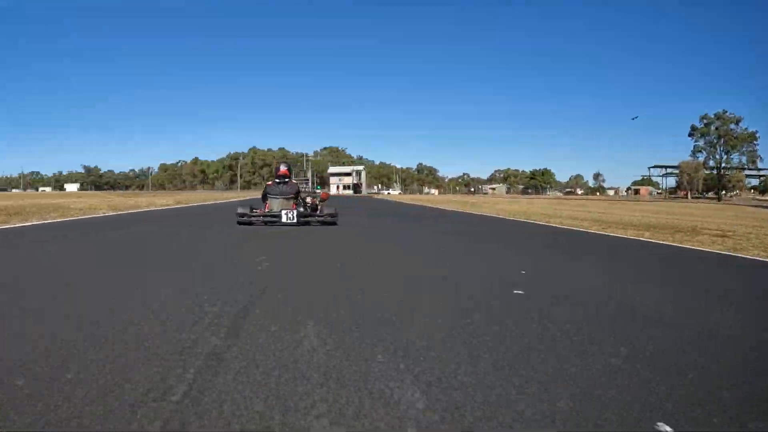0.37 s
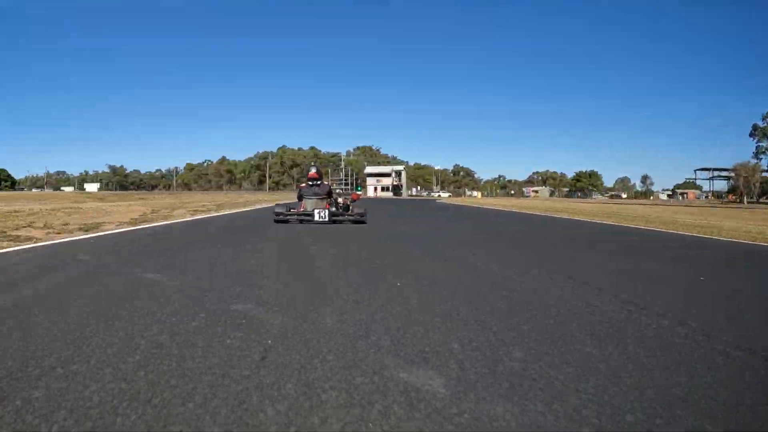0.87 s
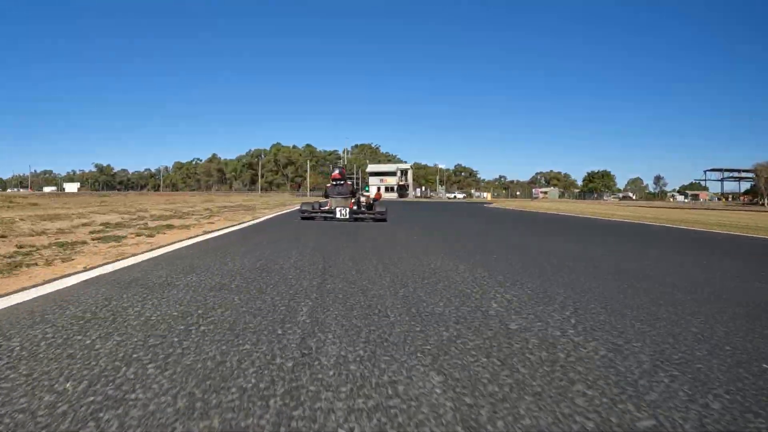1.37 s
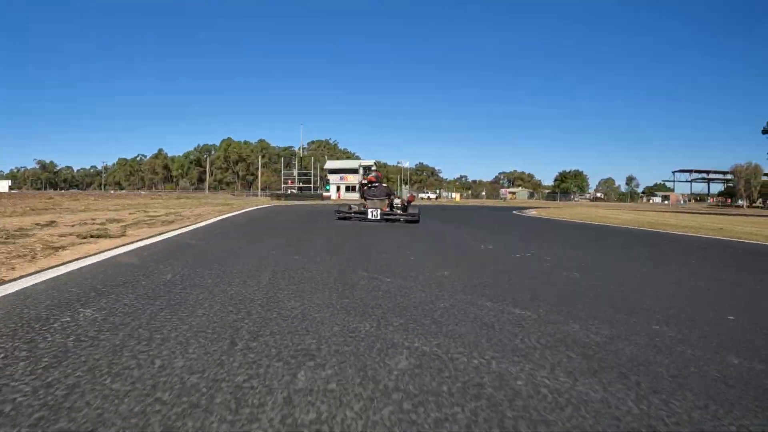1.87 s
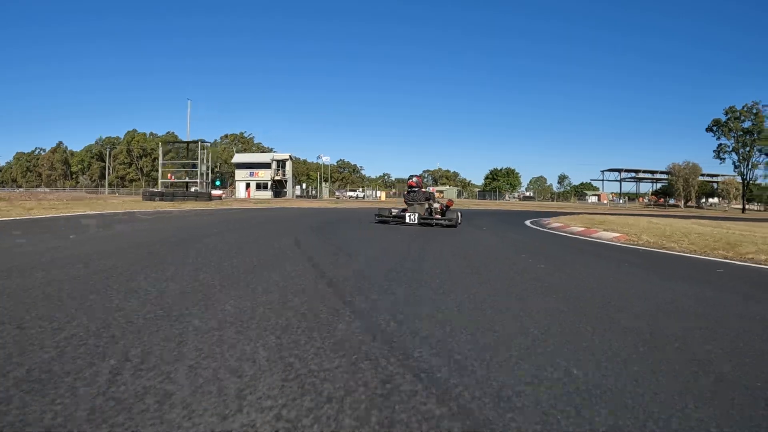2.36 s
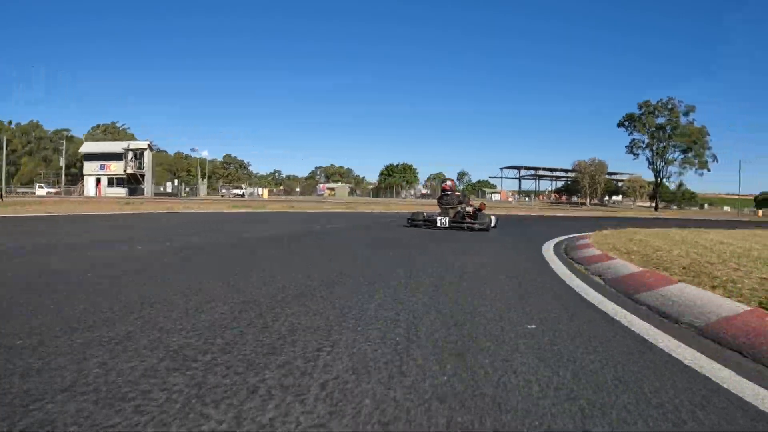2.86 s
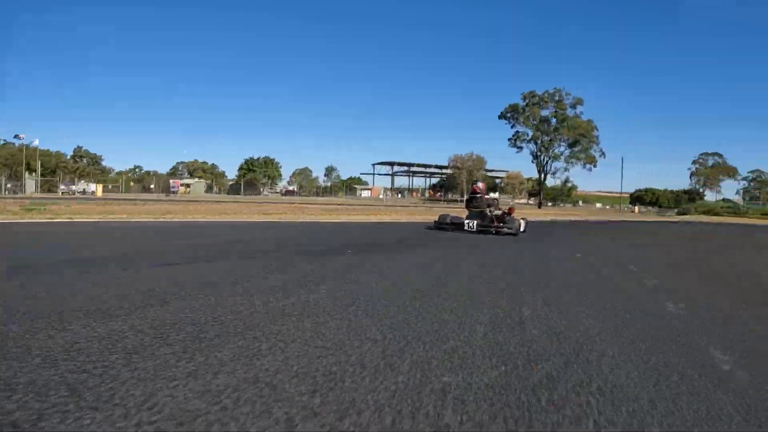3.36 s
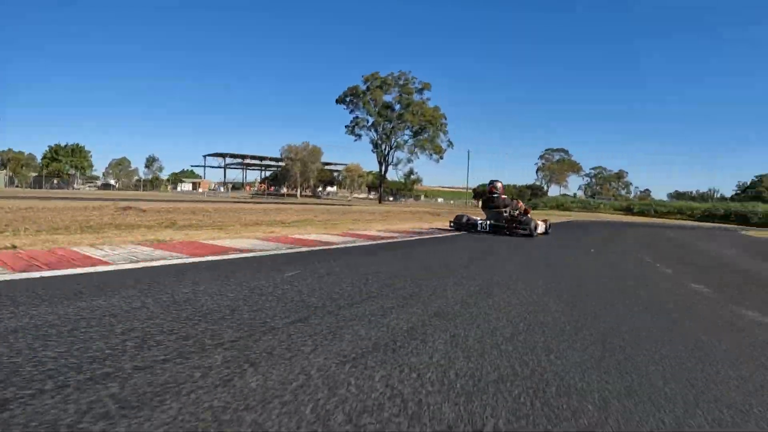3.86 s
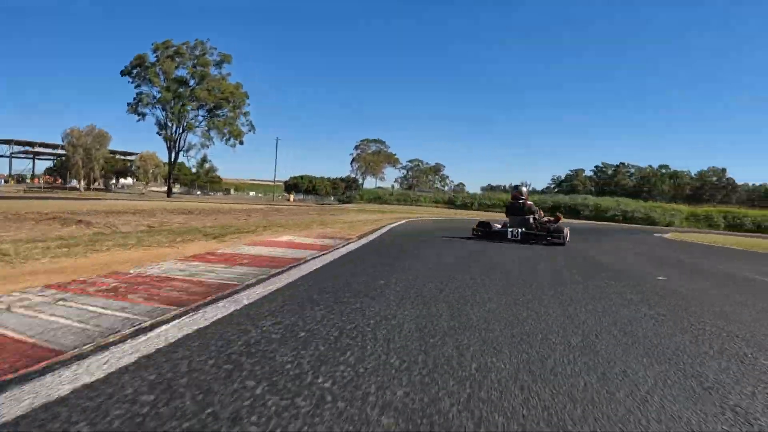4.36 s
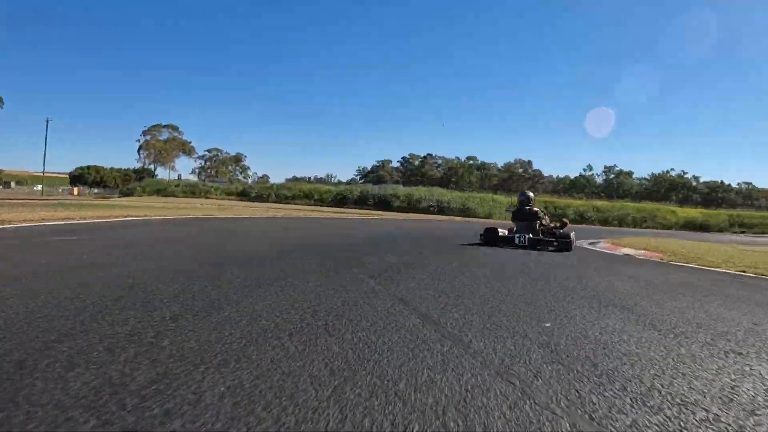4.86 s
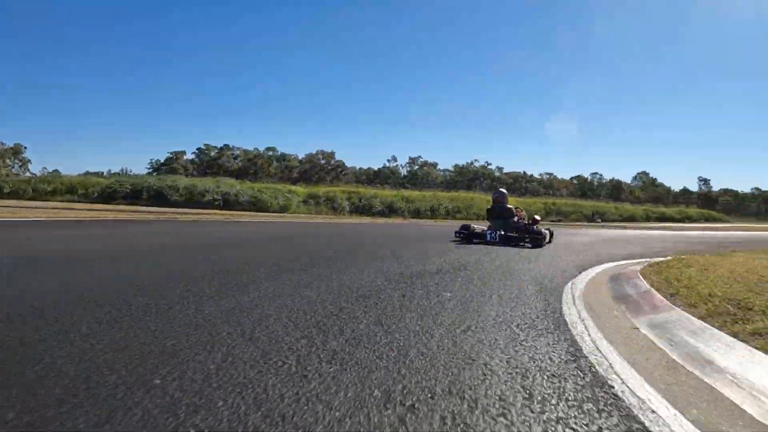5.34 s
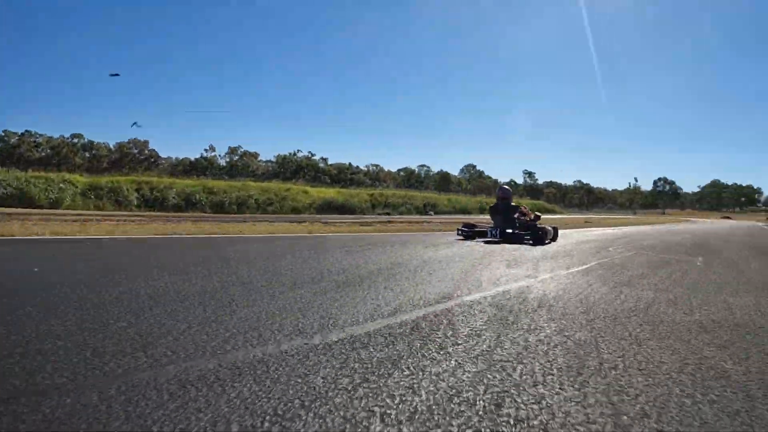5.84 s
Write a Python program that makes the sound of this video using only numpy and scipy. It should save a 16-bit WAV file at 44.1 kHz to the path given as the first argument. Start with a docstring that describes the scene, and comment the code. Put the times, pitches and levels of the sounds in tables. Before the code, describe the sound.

A racing kart engine drones and roars low and muffled, then its exhaust breaks into thickening sharp pops over rumble, wind and treble rattle.

```python
"""An engine drone in low crank orders over frame rumble, a low half-order throb, a beating roar, a whine and a
treble rattle: on board a racing kart on an open circuit, another kart just ahead. Grit ticks on the dull
housing. From the end of the straight the exhaust pops, each pop a crack, a pipe ring and a late thump, with a
swelling treble hiss. Orders are sines, beds are shaped noise, pops are decaying modes."""
import sys
import numpy as np
from scipy import signal
from scipy.fft import rfft, irfft
from scipy.io import wavfile
from scipy.ndimage import uniform_filter1d

SR = 44100
rng = np.random.default_rng(int(sys.argv[2]) if len(sys.argv) > 2 else 0)


def master_out(mix):
    """Clip the mix to full scale and print it as 16-bit PCM to the path in sys.argv[1]."""
    frames = np.transpose(np.atleast_2d(mix))
    ceiling = np.clip(frames, -1, 1)
    pcm = np.round(ceiling * 32767).astype(np.int16)
    wavfile.write(sys.argv[1], SR, pcm)


def volts_from_db(level):
    """Convert decibel levels to linear amplitude ratios."""
    exponent = np.asarray(level, float) / 20
    return 10 ** exponent


N = 263277


def rms_one(x):
    """Scale to unit rms."""
    return x / np.sqrt(np.mean(x ** 2) + 1e-20)


def in_time(rows):
    """Columns of a curve table, interpolated at every sample."""
    s, *columns = np.transpose(rows)
    return [np.interp(np.arange(N) / SR, s, column) for column in columns]


def at_hz(points, hz):
    """Read a spectrum on a log-frequency axis."""
    point_hz, point_db = np.transpose(points)
    return np.interp(np.log(hz), np.log(point_hz), point_db)


def drift(rate_hz):
    """Slow random curve of rms 1: noise through two equal poles at rate_hz."""
    step, settle = 40, 2000   # samples per point, points discarded
    r = np.exp(-2 * np.pi * rate_hz * step / SR)
    noise = rng.standard_normal(N // step + settle + 2)
    slow = signal.lfilter([1], [1, -2 * r, r * r], noise)[settle:]
    return np.interp(np.arange(N) / step, np.arange(len(slow)), rms_one(slow))


def coloured(spectrum):
    """Noise with the given spectrum, rms 1."""
    hz = np.maximum(np.fft.rfftfreq(N, 1 / SR), 1)
    white = rfft(rng.standard_normal(N))
    return rms_one(irfft(white * volts_from_db(at_hz(spectrum, hz)), N))


def ring(drive, hz, t60_s):
    """Two-pole resonator: a unit click sets a decaying sine of height 1 ringing."""
    r, w = volts_from_db(-60 / (t60_s * SR)), 2 * np.pi * hz / SR
    return signal.lfilter([0, np.sin(w)], [1, -2 * r * np.cos(w), r * r], drive + 1e-18)


def resonance(drive, hz, width_hz):
    """Resonator set by its bandwidth, from which its decay follows."""
    return ring(drive, hz, t60_s=np.log(1000) / np.pi / width_hz)


def soften(x, cut_hz):
    """Steep low-pass."""
    return signal.sosfilt(signal.butter(4, min(cut_hz, .45 * SR), fs=SR, output="sos"), x)


def dying(clicks, t60_s):
    """Each click becomes an exponential decay."""
    return signal.lfilter([1], [1, -volts_from_db(-60 / (t60_s * SR))], clicks + 1e-18)


# engine speed: start_s, speed_turns_per_s (crank)
ENGINE_SPEED = [(0, 35.4), (.38, 35.6), (.7, 35.7), (1.39, 38.2), (1.77, 39.4), (2.3, 40.2), (3, 41.4),
                (3.74, 42.4), (4.4, 43.1), (4.7, 42.7), (5.3, 41.5), (5.97, 41.5)]
# firing evenness as level of the upper orders, and roar: start_s, upper_db, roar_db
ENGINE_LEVELS = [(0, -27.5, -19.5), (.35, -28.5, -19.5), (.7, -22, -20), (1, -22.5, -19), (1.3, -23, -21.5),
                 (1.6, -23, -19.5), (1.85, -24, -21.5), (2.15, -27.5, -20), (3, -26.5, -24.5),
                 (3.55, -34.5, -20), (4.2, -33.5, -24), (4.6, -27.5, -22.5), (5, -26, -19),
                 (5.5, -38, -20.5), (5.97, -25, -24)]
# frame's uneven passing of the three lowest orders: pitch_hz, level_db
FRAME_RESPONSE = [(35, -18), (39, -16), (41.5, -18), (43.5, -11), (70, -19), (74, -23), (79, -17.5),
                  (83, -19), (87, -21.5), (106, -21.5), (110, -18), (118, -28.5), (124, -23.5), (129, -18)]
# pipe resonances that swell the upper orders: pitch_hz, level_db
PIPE_RESPONSE = [(130, -15), (146, -3.5), (157, 2), (185, -3.5), (213, 1.5), (238, -16), (260, -12.5),
                 (282, -7.5), (296, -6.5), (308, -1), (318, -3.5), (340, -20.5), (450, -8.5), (520, -28),
                 (600, -21.5), (700, -18), (900, -30)]
LOW_ORDER_WANDER_RAD = .6


def drone(turns, speed, upper_db, waver_db, wander_rad, shake_db):
    """Crank orders as sines; the low three shake with the frame, the rest wander more with their order."""
    out = np.zeros(N)
    sag_db = misfiring()
    for order in range(1, 23):
        hz = order * speed
        if order <= 3:
            level_db = at_hz(FRAME_RESPONSE, hz) + sag_db + shake_db * drift(4.4)
            phase_spread_rad = LOW_ORDER_WANDER_RAD
        else:
            level_db = upper_db + at_hz(PIPE_RESPONSE, hz)
            phase_spread_rad = wander_rad * order
        phase = 2 * np.pi * (order * turns + rng.random()) + phase_spread_rad * drift(2.73)
        level_db = level_db + waver_db * np.log(order) * drift(4.0)
        out += np.sqrt(2) * volts_from_db(level_db) * np.sin(phase)   # level is rms
    return out


# engine half-order throb peaking near 23 Hz: pitch_hz, level_db_per_hz
HALF_ORDER_SPECTRUM = [(8, -14), (17, 20), (23, 15.5), (29, 8), (40, -41.5), (200, -140)]
HALF_ORDER_DB, HALF_ORDER_SWELL_DB = -34, 4


def half_order():
    """Low noise band at the engine's half order, swelling and fading at random."""
    return volts_from_db(HALF_ORDER_DB + HALF_ORDER_SWELL_DB * drift(7.0)) * coloured(HALF_ORDER_SPECTRUM)


# frame rumble: pitch_hz, level_db_per_hz
RUMBLE_SPECTRUM = [(25, -50), (38, -21.5), (46, 25.5), (54, 26.5), (63, 17.5), (75, -17.5), (110, -31.5),
                   (300, -140)]
# bumps in the track: centre_s, level_db, length_s
TRACK_BUMPS = [(0.961, -30.5, 0.44), (1.814, -21, 0.13), (2.46, -31, 0.082), (3.323, -41, 0.091),
               (3.705, -13.5, 0.04), (4.152, -17, 0.16), (5.32, -17, 0.081), (4.542, -26, 0.1),
               (4.856, -16, 0.093), (5.86, -19.5, 0.061)]
RUMBLE_DB = -19.5


def rumble():
    """Low frame noise, swelling and fading over each bump."""
    t = np.arange(N) / SR
    swell = volts_from_db(RUMBLE_DB)
    for centre_s, level_db, length_s in TRACK_BUMPS:
        swell = swell + volts_from_db(level_db) * np.exp(-(2 * (t - centre_s) / length_s) ** 2)
    return swell * coloured(RUMBLE_SPECTRUM)


def beat(turns, depth):
    """A puff once per crank turn, each of its own size; rms 1."""
    sizes = volts_from_db(2.9 * rng.standard_normal(int(turns[-1]) + 1))[turns.astype(int)]
    return rms_one(1 - depth + depth * sizes * np.sin(np.pi * turns) ** 2)


# roar of both karts through the housing: pitch_hz, level_db_per_hz
ROAR_SPECTRUM = [(45, -27), (72, -6), (95, -9.5), (130, -4), (205, 0), (290, -3), (360, -6.5), (450, -7),
                 (670, -14.5), (990, -24.5), (1260, -23), (1750, -31.5), (2500, -46.5), (3400, -76),
                 (6000, -115)]
ROAR_SWAY_DB, ROAR_FLUTTER_DB = 1.66, .8
# even firing moves the low roar into the orders: loss per dB of evenness above the rough level
CLEARING_DB_PER_DB, CLEAR_BELOW_HZ, ROUGH_AT_DB = 0.18, 490, -27.5


def roar(turns, roar_db, upper_db):
    """Beating engine noise whose low part thins while the firing is even."""
    level_db = roar_db + ROAR_SWAY_DB * drift(1.6) + ROAR_FLUTTER_DB * drift(17.0)
    noise = volts_from_db(level_db) * coloured(ROAR_SPECTRUM) * beat(turns, depth=0.33)
    low = signal.sosfiltfilt(signal.butter(2, CLEAR_BELOW_HZ, fs=SR, output="sos"), noise)
    loss_db = CLEARING_DB_PER_DB * np.maximum(upper_db - ROUGH_AT_DB, 0)
    return noise - low * (1 - volts_from_db(-loss_db))


# narrow cavity resonances: pitch_hz, width_hz, level_db
CAVITIES = [(1668, 290, -46), (3030, 170, -67.5), (3936, 90, -70), (4340, 330, -64.5)]


def hollows():
    """Noise ringing in narrow cavities, swelling and fading."""
    out = np.zeros(N)
    for hz, width_hz, level_db in CAVITIES:
        tone = resonance(rng.standard_normal(N), hz, width_hz)
        out += volts_from_db(level_db + 2.0 * drift(3.0)) * rms_one(soften(tone, 1.15 * hz))
    return out


# whine that comes and goes: start_s, level_db
WHINE_LEVEL = [(0, -44), (.35, -38.5), (.85, -38.5), (1.25, -34), (1.45, -41.5), (1.9, -41), (2.3, -38),
               (3.1, -43.5), (3.28, -36.5), (3.5, -33), (3.88, -43), (4.08, -38), (4.46, -41), (5.3, -45),
               (5.95, -52.5)]
WHINE_HZ, WHINE_WIDTH_HZ, WHINE_STROKE_DB = 1358, 45, 1


def whine():
    """Noise in one narrow resonance, its drive swelling in short strokes."""
    level_db, = in_time(WHINE_LEVEL)
    drive = volts_from_db(WHINE_STROKE_DB * drift(6.1)) * rng.standard_normal(N)
    tone = resonance(drive, WHINE_HZ, WHINE_WIDTH_HZ)
    return volts_from_db(level_db) * rms_one(soften(tone, cut_hz=2000))


# chain and bodywork rattle: pitch_hz, level_db_per_hz
RATTLE_SPECTRUM = [(1500, -49), (2400, -18.5), (2900, 4), (3400, -3), (4050, -1.5), (5000, -4.5),
                   (5850, -6.5), (6200, -11), (6900, -8), (8500, -16), (10000, -28), (12500, -34),
                   (15000, -43), (16500, -76.5)]
# level at the reference speed, growth per turn/s, reference speed
RATTLE_DB, RATTLE_DB_PER_TURN_PER_S, RATTLE_AT_TURNS_PER_S = -52.5, 0.6, 40.44


def rattle(speed, grains_per_s, grain_db):
    """A treble hiss growing with engine speed, roughened by dense uneven grains."""
    struck = rng.random(N) < grains_per_s / SR
    grains = struck * volts_from_db(grain_db * np.minimum(rng.exponential(1, N), 4))
    lumps = uniform_filter1d(grains, size=90)
    roughness = rms_one(5.8 + lumps / lumps.mean())
    flutter = volts_from_db(1.7 * drift(20.0))
    level_db = RATTLE_DB + RATTLE_DB_PER_TURN_PER_S * (speed - RATTLE_AT_TURNS_PER_S)
    return volts_from_db(level_db) * coloured(RATTLE_SPECTRUM) * roughness * flutter


# grit hitting the housing: start_s, peak_db, top_octave_db (against the peak)
GRIT_TICKS = [(0.6405, -45, -13), (1.6214, -48, -9.5), (1.801, -45, -21.5), (1.8252, -48.5, -25),
              (2.182, -34.5, -11), (2.6538, -48, -13.5), (2.741, -40, -24), (2.774, -57, -17.5),
              (2.8121, -44, -25), (2.8252, -41, -11), (2.989, -53, -24), (3.0905, -49, -13),
              (3.184, -47, -21), (3.2674, -53, -16), (3.501, -45.5, -12.5), (3.74, -40, -14),
              (3.8677, -62, -26), (4.0159, -42.5, -20), (4.3102, -41.5, -21), (5.3535, -42.5, -19.5),
              (2.899, -52.5, -10), (3.029, -33.5, -21.5), (3.2046, -41, -15), (3.2136, -38.5, -31.5),
              (3.2475, -46.5, -11.5), (3.2907, -48, -12.5), (3.308, -39, -17.5), (3.3345, -41, -19),
              (3.381, -41, -19), (3.389, -45, -28), (3.5164, -38, -29), (3.5832, -47, -26),
              (3.618, -38.5, -27.5), (3.723, -43, -19), (3.7684, -36.5, -36.5), (3.8211, -35.5, -24.5),
              (3.928, -39, -37), (4.034, -31, -25.5), (4.1454, -42, -14), (4.4935, -54, -21),
              (4.517, -50, -30), (4.541, -48, -27), (4.566, -56, -30), (4.637, -50, -25),
              (4.729, -42.5, -27.5), (4.7994, -56.5, -22), (4.8239, -52, -16), (5.327, -33.5, -19),
              (5.346, -40.5, -21.5)]
# faint ticks between the loud ones, once the kart turns in
GRIT_PER_S, GRIT_DB, GRIT_SPREAD_DB, GRIT_FROM_S = 19, -64, 6.5, 1.7


def ticks(length_s):
    """Very short bright noise bursts; some reach far higher than others."""
    s, peak_db, top_db = np.transpose(GRIT_TICKS)
    struck = (rng.random(N) < GRIT_PER_S / SR) * (np.arange(N) > GRIT_FROM_S * SR)
    faint = struck * volts_from_db(GRIT_DB + GRIT_SPREAD_DB * rng.standard_normal(N))
    body = [(2500, -10.5), (3800, 6.5), (4500, -2), (7000, -1.5), (9000, -13.0), (10500, -45.0)]
    top = [(6000, -39.5), (9500, 1), (15000, 0.0), (17000, -40.0)]
    out = np.zeros(N)
    for level_db, faint_db, spectrum in ((peak_db, 0.1, body), (peak_db + top_db, -18, top)):
        clicks = faint * volts_from_db(faint_db)
        clicks[(s * SR).astype(int)] = volts_from_db(level_db)
        out += coloured(spectrum) * uniform_filter1d(dying(clicks, length_s), size=30)
    return out


# exhaust pops: start_s, crack_db, thump_db, sizzle_db (last two against the crack)
EXHAUST_POPS = [(1.6806, -19.5, 5.0, -2.0), (1.7134, -25.5, 8.0, 0.5), (1.7561, -18.0, 3.5, 0.0),
                (1.8599, -18.5, 4.0, -1.5), (1.8906, -23.0, 5.5, 0.0), (1.936, -18.5, 5.5, 1.5),
                (2.1132, -25.0, 5.0, 1.5), (2.3622, -20.5, 2.5, 0.5), (2.4061, -16.0, 3.0, 0.0),
                (2.5337, -18.0, 3.5, 1.0), (2.5819, -21.5, 1.0, 1.0), (2.6563, -20.0, 4.5, 1.0),
                (2.6985, -15.5, 2.5, -2.0), (2.7494, -16.5, 2.5, -2.0), (2.7953, -25.5, 3.0, -4.0),
                (2.8239, -15.0, 2.5, 2.5), (2.8712, -17.5, 4.5, 0.0), (2.918, -17.0, 4.0, -1.0),
                (2.9636, -18.0, 2.5, -4.0), (3.0432, -22.5, 5.0, -0.5), (3.091, -17.0, 3.5, 2.5),
                (3.1375, -20.0, 5.5, 1.0), (3.1752, -24.5, 3.5, -1.0), (3.3981, -23.5, 0.0, -1.0),
                (3.4518, -24.5, 0.5, 0.0), (3.5, -20.5, 1.5, -0.5), (3.6137, -17.0, 2.5, -1.0),
                (3.6605, -14.5, 2.0, -1.5), (3.7349, -24.0, 2.0, -4.5), (3.7842, -16.0, 3.5, 4.0),
                (3.8286, -17.0, 4.0, 0.0), (3.8764, -23.0, 5.5, -1.0), (3.9147, -28.5, -1.0, -2.5),
                (3.9472, -17.5, 3.5, 0.0), (3.9929, -16.5, 4.0, -0.5), (4.0198, -20.0, 3.5, -1.5),
                (4.0397, -20.0, 5.0, -1.0), (4.0787, -23.0, 5.0, 1.5), (4.1222, -20.0, 0.0, 3.0),
                (4.1577, -17.5, 2.0, -0.5), (4.2058, -27.0, 3.5, -1.0), (4.2399, -26.5, 7.0, -4.0),
                (4.2772, -21.5, 2.5, -0.5), (4.2991, -22.0, 3.5, -2.0), (4.3574, -27.5, 7.0, -3.0),
                (4.4354, -18.0, 3.5, -0.5), (4.4761, -22.0, 0.5, -1.5), (4.5257, -20.0, 1.5, -2.5),
                (4.5554, -20.0, 3.0, -0.5), (4.5647, -25.5, 2.5, 2.5), (4.6011, -18.0, 4.0, 0.5),
                (4.6115, -28.5, 9.5, 3.0), (4.6222, -24.0, 5.5, 0.0), (4.6446, -17.5, 3.0, 0.0),
                (4.6914, -17.5, 3.5, 1.5), (4.7153, -30.0, 8.0, -3.0), (4.7384, -17.0, 4.0, 1.0),
                (4.7689, -24.5, 4.0, -1.0), (4.828, -20.0, 1.5, -2.5), (4.8547, -23.5, 1.0, -1.5),
                (4.8792, -17.0, 2.0, -1.5), (4.9061, -16.5, 3.5, 1.0), (4.9257, -18.5, 3.0, -3.0),
                (4.9516, -20.0, 5.0, -1.5), (4.9778, -18.5, 4.0, 1.0), (5.0056, -24.5, 1.5, -2.0),
                (5.045, -15.5, 1.0, -2.0), (5.073, -17.0, 3.5, 2.5), (5.091, -30.0, 7.5, -8.0),
                (5.1391, -18.0, 1.5, -3.5), (5.1896, -15.5, 2.5, 1.5), (5.2111, -22.5, 1.5, -2.5),
                (5.24, -17.0, 3.0, 0.5), (5.2646, -18.0, 3.5, 2.0), (5.2827, -23.0, 3.0, -2.0),
                (5.3198, -16.0, 2.5, 0.0), (5.3543, -19.0, 2.0, -1.0), (5.3851, -19.0, 4.0, 1.5),
                (5.3969, -24.0, 2.0, -7.0), (5.4488, -17.5, 2.5, -1.0), (5.4796, -18.0, 3.5, 0.0),
                (5.4988, -16.5, 2.0, -1.0), (5.526, -17.0, 3.5, 0.0), (5.5563, -24.0, 6.5, -1.5),
                (5.5934, -17.0, 0.5, -0.5), (5.6215, -18.0, 4.5, 2.5), (5.6417, -18.0, 4.5, -1.0),
                (5.6885, -25.5, 2.0, -5.5), (5.7216, -26.5, 0.5, 0.0), (5.7331, -17.5, 1.5, -1.5),
                (5.7647, -15.5, 1.5, -2.0), (5.8186, -18.0, 4.0, 2.5), (5.8607, -16.5, 2.5, -1.0),
                (5.8915, -25.0, 5.0, -2.0), (5.9061, -24.5, 5.0, -0.5), (5.9493, -17.0, 4.0, 1.0)]
# modes a pop rings: pitch_hz, level_db, t60_s, arrival_ms, polarity
EXHAUST_MODES = [(1904, 3.5, .008, 1.1, -1), (1027, 3.5, .007, 1.11, -1), (2720, -10, .011, 1.11, -1),
                 (3307, -9.5, .01, 1.14, -1), (3753, -11.5, .013, 1.13, -1), (3923, -13.5, .016, 1.08, -1),
                 (3840, -26, .07, 1.1, 1), (4500, -17, .014, 1.03, -1), (5290, -9, .0015, 1.01, 1),
                 (6550, -19, .0085, 1.1, -1), (2299, -22, .06, .91, 1), (1371, -1.5, .02, 3.61, 1),
                 (1164, -3.5, .0125, 3.37, 1), (1655, -4, .0105, 3.52, 1), (1063, -18, .069, 2.79, -1),
                 (1748, -20, .035, 3.18, -1), (590, -2.5, .005, 2.39, 1), (589, -1.5, .037, .92, -1),
                 (415, -5, .04, 3, 1), (686, -12.5, .076, 3.04, 1), (351, -2.5, .079, 2.69, 1),
                 (273, 10, .022, 4.84, -1), (199.5, 9.5, .044, 4.49, -1), (122.8, 1.5, .14, 5, 1),
                 (56.7, -3, .22, 7.96, 1)]
THUMP_BELOW_HZ, SIZZLE_ABOVE_HZ = 700, 2500
# each mode varies a little from pop to pop: relative spread of pitch, spread of arrival, log spread of decay
DETUNE, ARRIVAL_SPREAD_CYCLES, DECAY_SPREAD = .008, .03, .25


def pops(spread_db):
    """Every pop strikes the same exhaust modes, a little off in pitch, strength, arrival and decay."""
    s, crack_db, thump_db, sizzle_db = np.transpose(EXHAUST_POPS)
    chance = rng.standard_normal((len(s), len(EXHAUST_MODES), 4))
    out = np.zeros(N)
    for k, (hz, level_db, t60_s, arrival_ms, polarity) in enumerate(EXHAUST_MODES):
        strength, pitch, arrival, decay = chance[:, k].T[:, :, None]
        pop_db = crack_db + thump_db * (hz < THUMP_BELOW_HZ) + sizzle_db * (hz > SIZZLE_ABOVE_HZ)
        t = np.arange(int(2 * t60_s * SR)) / SR
        fall_db = 60 * t / (t60_s * np.exp(DECAY_SPREAD * decay))
        envelope = volts_from_db(pop_db[:, None] + level_db + spread_db * strength - fall_db)
        rings = polarity * envelope * np.sin(2 * np.pi * hz * (1 + DETUNE * pitch) * t)
        start_s = s[:, None] + arrival_ms / 1000 + ARRIVAL_SPREAD_CYCLES * arrival / hz
        places = (start_s * SR).astype(int) + np.arange(len(t))
        track = np.bincount(places.ravel(), rings.ravel(), minlength=N)[:N]
        out += soften(track + 1e-18, 5.04 * hz)   # soft front: low-passed about five times above each mode
    return out


def pop_noise(swell_db, rise_s, fall_s, rasp_db, rasp_s):
    """Noise around each pop: a treble hiss swells before and fades after, then a ragged rasp."""
    s, crack_db, _, sizzle_db = np.transpose(EXHAUST_POPS)
    clicks, bright = np.zeros((2, N))
    clicks[(s * SR).astype(int)] = volts_from_db(crack_db)
    bright[(s * SR).astype(int)] = volts_from_db(crack_db + sizzle_db)
    rise = dying(bright[::-1], rise_s)[::-1]
    swell = np.maximum(dying(bright, fall_s), rise) * volts_from_db(0.45 * drift(150.0))
    treble = swell * coloured([(2000, -13.5), (2200, 0), (2300, 12.5), (2420, -9), (2600, -7), (3500, -1.0),
                               (3830, 2.0), (4100, -7.5), (4600, 0.5), (5500, -12.5), (7000, -21.0),
                               (9500, -46.5)])
    rasp = dying(clicks, rasp_s) * coloured([(200, -26.0), (500, -8.0), (1100, -11.5), (1800, 1.5),
                                             (2400, -14.5), (3200, -47.0), (6000, -85.5)])
    return volts_from_db(swell_db) * treble + volts_from_db(rasp_db) * rasp


# low orders sag per pop a second, averaged twice over half the span
MISFIRE_DB_PER_POP_PER_S, MISFIRE_SPAN_S = -.15, .4


def misfiring():
    """Level change in dB of the low orders, falling while pops come thick."""
    marks = np.zeros(N)
    marks[(np.array(EXHAUST_POPS)[:, 0] * SR).astype(int)] = SR
    half_span = int(MISFIRE_SPAN_S * SR / 2)
    pops_per_s = uniform_filter1d(uniform_filter1d(marks, size=half_span), size=half_span)
    return MISFIRE_DB_PER_POP_PER_S * pops_per_s


def scene():
    """Engine, beds, ticks and pops at one microphone."""
    speed, = in_time(ENGINE_SPEED)
    upper_db, roar_db = in_time(ENGINE_LEVELS)
    turns = np.cumsum(speed) / SR
    engine = drone(turns, speed, upper_db, waver_db=.6, wander_rad=.011, shake_db=1.8)
    lows = half_order() + rumble()
    mids = roar(turns, roar_db, upper_db) + hollows() + whine()
    treble = rattle(speed, grains_per_s=94.0, grain_db=-1.5)
    grit = ticks(length_s=0.026)
    around_pops = pop_noise(swell_db=-25.5, rise_s=0.085, fall_s=0.046, rasp_db=-6.5, rasp_s=0.037)
    bangs = soften(pops(spread_db=1.2) + around_pops, cut_hz=7300)
    return (engine + lows + mids + treble + grit + bangs)[None]


# held level, share of the excess removed, time constant
LEVELLER_DB, LEVELLER_SHARE, LEVELLER_S = -13.5, 0.41, 0.019


def levelled(x):
    """Gain control: the louder the last moments, the lower the gain."""
    r = np.exp(-1 / (LEVELLER_S * SR))
    power, _ = signal.lfilter([1 - r], [1, -r], x ** 2, zi=[[volts_from_db(2 * LEVELLER_DB)]])
    level_db = 10 * np.log10(power + 1e-9)
    return x * volts_from_db(-LEVELLER_SHARE * (level_db - LEVELLER_DB))


def band_limit(x):
    """A steep low-pass at the top of the band."""
    return signal.sosfilt(signal.butter(12, 15800, fs=SR, output="sos"), x)


def record(dry):
    """The level is evened, then peaks are rounded."""
    peak = .85
    mix = peak * np.tanh(levelled(dry) / peak)
    return band_limit(mix)


dry = scene()
out = record(dry)
master_out(out)
```